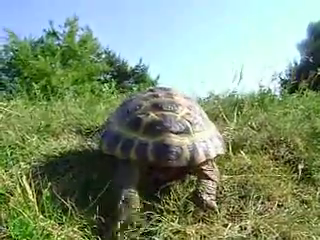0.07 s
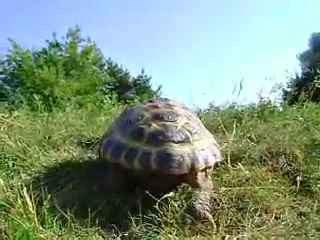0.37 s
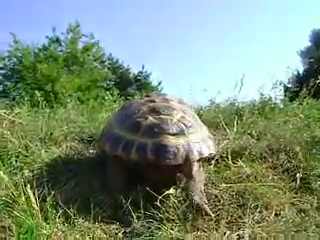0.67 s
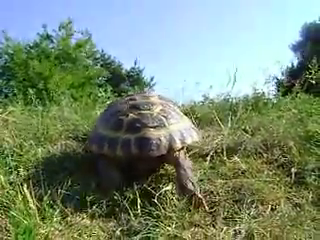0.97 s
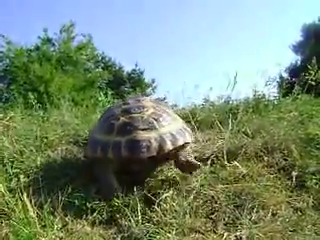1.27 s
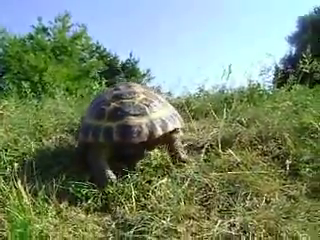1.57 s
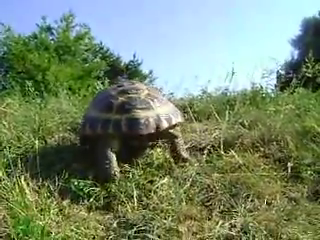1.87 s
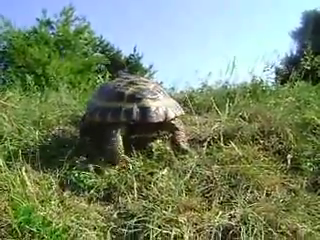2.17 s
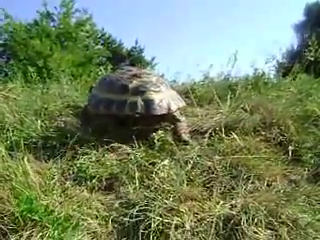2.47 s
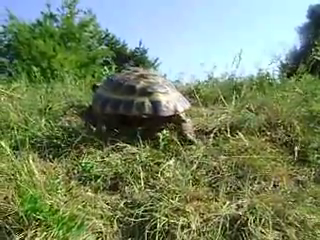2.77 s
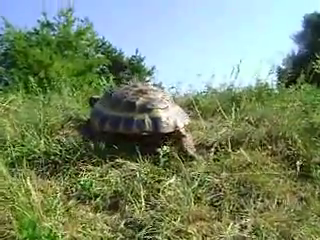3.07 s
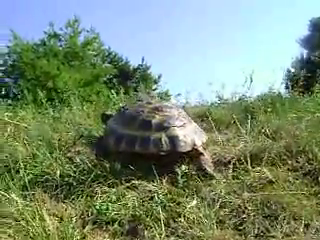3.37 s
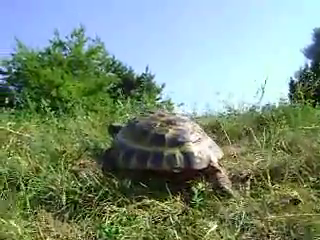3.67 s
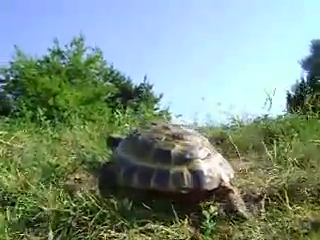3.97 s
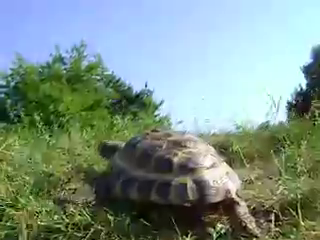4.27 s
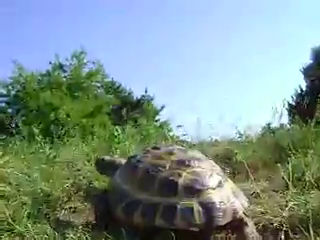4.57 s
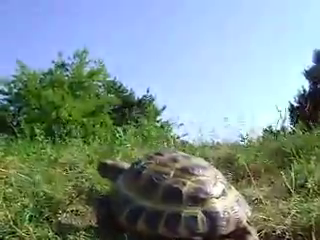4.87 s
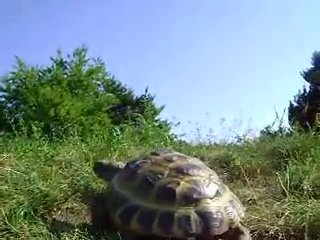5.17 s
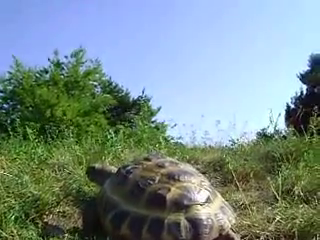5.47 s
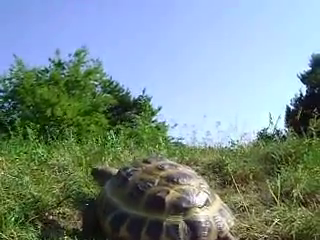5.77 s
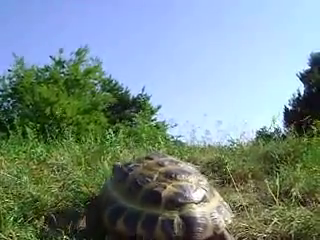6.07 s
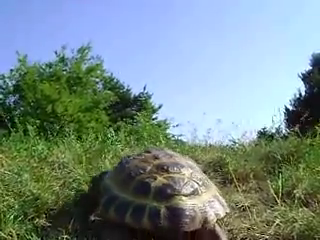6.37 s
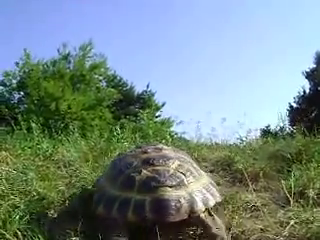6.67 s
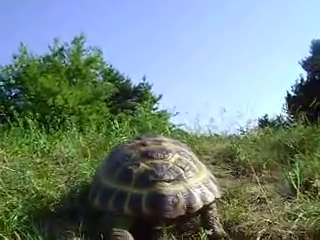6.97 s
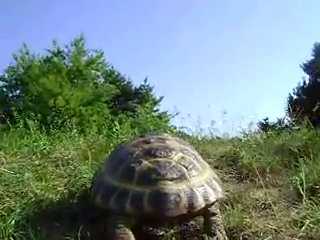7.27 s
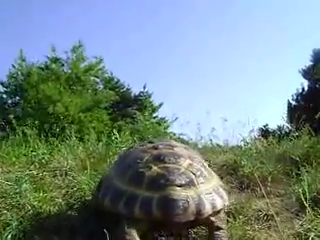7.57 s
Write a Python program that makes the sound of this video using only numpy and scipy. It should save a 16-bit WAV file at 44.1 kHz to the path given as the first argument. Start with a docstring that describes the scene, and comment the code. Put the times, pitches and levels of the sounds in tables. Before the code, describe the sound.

A tortoise walks through dry grass on an open hillside, the stalks rustling and snapping close to the microphone. Hollow clicks from a hand-held camera's case come in irregular clusters, loudest in the first three seconds. Later a songbird sings one phrase: a whistle, four warbles and a few falling chirps. Low puffs of wind bump the microphone at the start and in the second half, over a soft rush of open air.

```python
"""Tortoise in dry grass

A tortoise walks through dry grass on an open hillside, a small hand-held camera close behind it.
Stalks rustle and snap up close, and the camera's hollow case clicks in the hand.
A songbird sings one phrase, a pure gliding tone. Puffs of wind bump the microphone,
and behind it all lie the soft rush of the open air and a few faint, far-off tones."""
import sys
import numpy as np
from scipy import signal
from scipy.fft import rfft, irfft, next_fast_len
from scipy.io import wavfile
from scipy.ndimage import uniform_filter1d, map_coordinates

SR = 44100
rng = np.random.default_rng(int(sys.argv[2]) if len(sys.argv) > 2 else 0)


def to_wav(sig):
    """Store sig (one row per channel, or 1-D mono) as 16-bit WAV at the path in sys.argv[1].

    Samples outside -1..1 are clipped; the rate is SR.
    """
    pcm = np.clip(np.atleast_2d(sig), -1, 1) * 32767
    pcm = np.round(pcm).astype(np.int16)
    wavfile.write(sys.argv[1], SR, pcm.T)  # frames by channels


N = 345303

# spectrum of dry grass blades, close up: f/Hz, level/dB
BLADES = [(200, -13), (600, -1), (1000, -3.5), (1600, -4), (2500, -2), (4000, -1.5), (4600, -4), (5150, -2),
          (7000, -7.5)]


def clicks(grit_db=-12, grit_t60=.01, thud_db=-24, thud_hz=330, thud_t60=.025):
    """Close clicks: a bright, damped snap with a little grit, over the case's ring and dull thud."""
    # t/s, knock level/dB, knock f/Hz, snap level/dB, snap f/Hz
    contacts = [(.0408, -8.5, 940, -19.5, 2750), (.1212, -10.5, 950, -20.5, 2750),
                (.259, -9.5, 946, -19, 2820), (.4027, -9, 990, -19, 2750), (.569, -14.5, 825, -9, 3900),
                (.648, -19, 790, -19, 3154), (.666, -38, 900, -24, 3900), (.763, -32, 1020, -22.5, 4000),
                (1.01, -16.5, 950, -9, 3790), (1.0514, -15, 870, -8.5, 2520), (1.0572, -9, 810, -2.5, 2400),
                (1.0588, -10.5, 1030, -1.5, 4320), (1.1296, -5, 770, -1, 3800),
                (1.1312, -11, 2000, -9, 2350), (1.788, -24, 1043, -32.5, 3580),
                (1.885, -29, 960, -39, 2860), (2.299, -20, 990, -33, 2560), (2.585, -26, 851, -42, 3100),
                (2.8253, -17, 790, -7.5, 3100), (2.8733, -4.5, 720, -7.5, 4400),
                (2.8744, -19, 1550, -10, 2350), (3.0781, -25, 800, -4.5, 3920),
                (3.124, -20.5, 690, -20, 4050), (5.615, -48, 1032, -20, 5160),
                (6.044, -33.5, 1700, -30, 2800), (6.1805, -13.5, 1130, -7.5, 3550),
                (6.574, -33, 1700, -24.5, 3080), (6.624, -30, 1000, -44, 3900),
                (6.879, -21, 1000, -49.5, 3200), (7.416, -20.5, 960, -50, 3600),
                (7.565, -22, 1023, -50, 2870)]
    # modes of the case's hollow body: f/Hz, relative level/dB, t60/s
    case_modes = [(520.3, -10, .06), (700, -9, 0.054), (800, -10, 0.054), (939, 2, 0.019),
                  (1130, -3.5, 0.023), (1307, -7, 0.015), (1657, -1, 0.018), (2103, -5.5, 0.012)]
    # modes of its stiff edges: f/Hz, relative level/dB, t60/s
    edge_modes = [(2475, -2, 0.0081), (2743, -1.5, 0.0087), (3313, -1.5, .007), (3820, 0, .008),
                  (4100, -2, .008), (4920, -1.5, .009)]
    out, t = np.zeros(N), np.arange(SR // 10) / SR
    low_cut = signal.butter(2, 520, "highpass", fs=SR, output="sos")
    thud = amp(thud_db - 60 * t / thud_t60) * np.sin(2 * np.pi * thud_hz * t)
    for s, knock_db, knock_hz, snap_db, snap_hz in contacts:
        ring = struck(case_modes, knock_hz, favour_db=6.5, spread=.18, rise_s=.00044)
        knock = signal.sosfilt(low_cut, ring) + thud
        edge = struck(edge_modes, snap_hz, favour_db=10, spread=.17, rise_s=.00026)
        force = amp(snap_db)  # a harder contact is grittier and reaches higher
        grit = coloured(rng.standard_normal(len(t)), BLADES)
        grit *= amp(grit_db + 5 * force - 60 * t / grit_t60)
        cutoff_hz = snap_hz + 650 + 2300 * force
        snap = filtered(edge + grit, lambda hz: 1 / np.sqrt(1 + (hz / cutoff_hz) ** 8))
        add(out, s, amp(knock_db) * knock + force * snap)
    return out


def struck(modes, pitch_hz, favour_db, spread, rise_s):
    """One blow, peak 1: the point of contact favours the modes near its pitch."""
    t = np.arange(SR // 10) / SR
    ring = np.zeros(len(t))
    for hz, db, t60 in modes:
        favour = favour_db * np.exp(-(np.log(hz / pitch_hz) / spread) ** 2)
        turns = hz * rng.normal(1, .012) * t + rng.normal(0, .17)
        ring += amp(db + favour + rng.normal(0, 1) - 60 * t / t60) * np.sin(2 * np.pi * turns)
    ring *= 1 - np.exp(-(t / rise_s) ** 2)
    return ring / abs(ring).max()


def rustles(ticks_per_s=2500, width_hz=600, focus_db=9, rub=.22):
    """Dry blades slip past the tortoise in many tiny ticks; each tuft favours a pitch of its own."""
    # brushes and soft scuffs: t/s, length/s, level/dB, f/Hz, place of the peak/0-1
    strokes = [(.644, .034, -35.5, 3560, 0), (.674, .13, -49, 2800, .33), (.852, .048, -32.5, 3100, .06),
               (.907, .28, -42.5, 3670, .04), (1.585, .04, -35.5, 3300, .2), (1.661, .077, -43, 3100, .6),
               (1.754, .08, -39, 3300, .3), (2.798, .028, -31, 3390, .9), (2.858, .02, -34, 4300, .9),
               (3.077, .025, -24.5, 4200, .1), (3.097, .036, -24.5, 3840, .53), (3.513, .09, -42, 4000, .4),
               (5.12, .1, -45, 600, .45), (5.295, .09, -45, 700, .4), (6.162, .02, -28.5, 3300, .7),
               (6.394, .13, -47, 1800, .2)]
    out = np.zeros(N)
    for s, length, db, pitch_hz, peak in strokes:
        u = np.linspace(0, 1, int(length * SR))
        slips = rng.standard_normal(len(u)) * (rub + (rng.random(len(u)) < ticks_per_s / SR))
        tuft = filtered(slips, lambda hz: amp(focus_db * np.exp(-((hz - pitch_hz) / width_hz) ** 2)))
        swell = np.sqrt(np.interp(u, [0, np.clip(peak, .02, .98), 1], [0, 1, 0]))
        add(out, s, amp(db) * swell * coloured(tuft, BLADES))
    return out


def bird(flutter_db=.7, ground_db=-12, ground_t60=.09, bushes_db=-18, bushes_t60=.6):
    """A whistle, four warbles and a falling flourish, scattered by ground and bushes."""
    # course of the opening whistle: t/s, f/Hz, level/dB
    opening = [(4.81, 4044, -54), (4.824, 4009, -48), (4.866, 4089, -37), (4.942, 4014, -28),
               (4.98, 4035, -26), (4.99, 4032, -35)]
    # t/s, crest length/s, crest f/Hz, crest level/dB, curl level/dB
    warbles = [(5.054, .031, 4270, -24.5, -30), (5.194, .035, 4370, -26.5, -28.5),
               (5.342, .029, 4290, -22, -30.5), (5.479, .034, 4250, -19, -34)]
    # closing chirps: t/s, length/s, relative level/dB, first f/Hz, middle f/Hz, last f/Hz
    flourish = [(5.993, .019, -32, 3100, 3900, 3950), (6.013, .016, -31.5, 4200, 3850, 3100),
                (6.054, .012, -33, 5900, 5300, 5900), (6.069, .014, -30, 5900, 4950, 5900),
                (6.085, .016, -27, 5800, 4820, 5700), (6.099, .018, -27, 5800, 4500, 3850),
                (6.113, .018, -28, 4000, 3750, 3150), (6.233, .012, -33, 5900, 4900, 5800),
                (6.246, .013, -30, 5600, 4600, 4200), (6.26, .018, -27.5, 5500, 4000, 3400),
                (6.275, .016, -38, 3400, 3300, 2950), (6.302, .016, -47, 2850, 3020, 3050)]
    song = np.zeros(N)
    add(song, opening[0][0], whistle(opening))
    for s, *note in warbles:
        add(song, s, warble(*note))
    for s, *note in flourish:
        add(song, s, chirp(*note))
    song *= amp(flutter_db * wobble(150))
    return song + amp(ground_db) * echo(song, ground_t60) + amp(bushes_db) * echo(song, bushes_t60)


def whistle(course):
    """One note of nearly even pitch that swells and stops short."""
    s, hz, db = np.transpose(course)
    t = np.arange(s[0], s[-1], 1 / SR)
    return tone(np.interp(t, s, hz), np.interp(t, s, db)) * signal.windows.tukey(len(t), .05)


def warble(hold_s, crest_hz, crest_db, curl_db, flick_db=-30, waver_hz=30, sag_db=6.5):
    """Three joined parts that each swell and sag: a flick up, an arch with a rising crest, a low curl."""
    flick_s, dip_s, climb_s, curl_s = .013, .005, .017, .009
    low_hz, flick_hz, dip_hz, curl_hz = 3280, 4150, 2950, 3680  # turning points
    crest_hz_per_s, fade_db_per_hz = 6000, .0095
    drift_hz = crest_hz_per_s * hold_s / 2
    # glide lengths/s, turning points f/Hz, f/Hz below which the voice fades, level/dB
    flick = ([flick_s * 2 / 3, flick_s / 3, dip_s],
             [low_hz, curl_hz, flick_hz, dip_hz], curl_hz, flick_db)
    arch = ([climb_s, hold_s, dip_s],
            [dip_hz, crest_hz - drift_hz, crest_hz + drift_hz, dip_hz], crest_hz - drift_hz, crest_db)
    curl = ([curl_s, curl_s, curl_s / 2],
            [dip_hz, curl_hz, (dip_hz + low_hz) / 2, low_hz], (low_hz + curl_hz) / 2, curl_db)
    pitch, level = [], []
    for spans, turns_hz, full_hz, db in (flick, arch, curl):
        t = np.arange(0, sum(spans), 1 / SR)
        hz = np.interp(t, np.cumsum([0] + spans), turns_hz)
        sag = sag_db * np.linspace(-1, 1, len(t)) ** 2
        fade = fade_db_per_hz * np.maximum(full_hz - hz, 0)
        pitch.append(hz)
        level.append(db - sag - fade)
    hz = np.concatenate(pitch)
    db = uniform_filter1d(np.concatenate(level), size=60)  # smooth the joins
    return tone(hz + waver_hz * wobble(130)[:len(hz)], db) * signal.windows.tukey(len(hz), .1)


def chirp(length, db, first_hz, middle_hz, last_hz, rasp_hz=120, trim_db=-2):
    """One short, slightly raspy swoop that swells and fades."""
    u = np.linspace(0, 1, int(length * SR))
    hz = np.polyval(np.polyfit([0, .5, 1], [first_hz, middle_hz, last_hz], 2), u)
    swell = np.sqrt(np.abs(np.sin(np.pi * u)))
    return swell * tone(hz + rasp_hz * wobble(900)[:len(u)], db + trim_db)


def wind(buffet_db=-2, lumps_db=2.5, churn_db=-14):
    """Wind on the microphone: lumpy rumble, and strong eddies that push, pull and break into churn."""
    # spectrum of the low turbulence: f/Hz, level/dB
    buffet_spectrum = [(12, -38.5), (20, 0), (97, -1.5), (225, -6.5), (305, -11.5), (341, -12.5),
                       (709, -26.5), (767, -28), (900, -25.5), (1170, -50), (1980, -120)]
    # spectrum of the fine turbulence: f/Hz, level/dB
    churn_spectrum = [(150, 2), (400, 4.5), (600, -7.5), (1000, -16), (2000, -47), (4000, -78.5)]
    # single eddies hitting the microphone: t/s, level/dB, f/Hz
    eddies = [(.072, -20, 60), (.182, -18, 130), (.237, -17, 110), (.268, -19.5, 50), (.427, -20, 80),
              (.527, -10, 161), (.538, -18.5, 210), (.655, -20, 76), (3.222, -28, 112), (3.903, -28.5, 70),
              (4.837, -20, 270), (4.846, -6.5, 135), (4.859, -17, 190), (4.884, -16.5, 100),
              (5.091, -22, 131), (6.66, -16, 130), (6.725, -17, 170), (6.834, -16.5, 250),
              (6.884, -16, 200), (6.944, -14, 210), (7.057, -14, 130), (7.271, -13.5, 71), (7.579, -9, 145)]
    rumble = coloured(rng.standard_normal(N), buffet_spectrum) * amp(lumps_db * wobble(45))
    out = amp(buffet_db) * gusts() * unit(rumble)
    t = np.arange(-SR // 40, SR // 40) / SR
    for s, db, hz in eddies:
        phase = 2 * np.pi * hz * t
        push = -np.sin(phase) / np.cosh(phase / 2.24)
        churn = coloured(rng.standard_normal(len(t)), churn_spectrum) / np.cosh(phase / 5)
        add(out, s + t[0], amp(db) * (push + amp(churn_db) * churn) * np.hanning(len(t)))
    return out


def gusts(rise_s=.05, fall_s=.13, breeze_db=-44):
    """Wind strength: puffs over a light breeze swell 20 dB in rise_s, hold, and fade 20 dB in fall_s."""
    # t/s, time held/s, relative level/dB
    puffs = [(0, .29, -28), (.39, .03, -34), (.525, .02, -20), (.63, .04, -31), (.75, .17, -38),
             (1.88, .17, -42), (3.21, .04, -34), (4.81, .085, -26), (5.07, .3, -36.5), (5.88, .22, -34.5),
             (6.34, .05, -36), (6.66, .38, -29), (7.21, .15, -32), (7.49, .34, -28.5)]
    t = np.arange(N) / SR
    power = np.full(N, amp(breeze_db) ** 2)
    for s, held, db in puffs:
        drop_db = 20 * np.maximum((s - t) / rise_s, (t - s - held) / fall_s).clip(0)
        power += amp(db - drop_db) ** 2
    return np.sqrt(power)


def air(rush_db=-41, patchy_db=.5, tone_trim_db=-1, unsteady_hz=5):
    """The steady rush of the open hillside, with faint gliding tones far away."""
    # spectrum of the rush: f/Hz, level/dB
    rush_spectrum = [(15, -37.5), (25, -8.5), (70, -8), (115, -14.5), (150, -6), (210, -7.5), (270, -12.5),
                     (500, -10), (1000, -15.5), (2400, -25), (4050, -23), (5200, -27), (7000, -31)]
    # t/s, length/s, relative level/dB, first f/Hz, last f/Hz
    far_tones = [(.25, 0.72, -44, 442, 440), (5.12, .11, -40, 513, 500), (5.45, 0.29, -41, 492, 457.7),
                 (5.58, .35, -47.5, 466, 455), (6.38, .035, -48, 2540, 2080),
                 (6.415, .045, -50, 2500, 2060)]
    out = amp(rush_db + patchy_db * wobble(7)) * coloured(rng.standard_normal(N), rush_spectrum)
    for s, length, db, first_hz, last_hz in far_tones:
        u = np.linspace(0, 1, int(length * SR))
        hz = first_hz + (last_hz - first_hz) * u + unsteady_hz * wobble(40)[:len(u)]
        swell = amp(db + tone_trim_db) * np.sin(np.pi * u)
        add(out, s, swell * np.sin(2 * np.pi * np.cumsum(hz) / SR))
    return out


def echo(x, t60):
    """Many small reflections dying away."""
    t = np.arange(SR // 2) / SR
    tail = rng.standard_normal(len(t)) * amp(-60 * t / t60)
    return signal.fftconvolve(x, tail / np.linalg.norm(tail))[:N]


def tone(hz, db):
    """A sine that follows a pitch, at an rms level."""
    return amp(db) * np.sqrt(2) * np.sin(2 * np.pi * np.cumsum(hz) / SR)


def amp(db):
    """Decibels to gain."""
    return 10 ** (np.asarray(db) / 20)


def unit(x):
    """Scaled to rms 1."""
    return x / np.sqrt(np.mean(x ** 2) + 1e-20)


def wobble(rate):
    """A smooth random curve, rate knots a second."""
    knots = rng.standard_normal(int(N * rate / SR) + 4)
    return map_coordinates(knots, [np.arange(N) * rate / SR])


def filtered(x, response):
    """x through a gain that depends on frequency."""
    size = next_fast_len(len(x) + 8192)
    return irfft(rfft(x, size) * response(np.fft.rfftfreq(size, 1 / SR)), size)[:len(x)]


def coloured(x, points):
    """x through a spectrum of (f/Hz, level/dB) points, at rms 1."""
    f, db = np.transpose(points)
    return unit(filtered(x, lambda hz: amp(np.interp(np.log(hz + 1), np.log(f), db))))


def add(track, s, sound):
    """Mix a sound into the track at time s."""
    span = track[max(round(s * SR), 0):][:len(sound)]
    span += sound[:len(span)]


def scene():
    """Everything reaches one small microphone, close behind the tortoise."""
    return (clicks() + rustles() + bird() + wind() + air())[None]


def record(dry, ceiling=.79, top_hz=16700):
    """The camera's microphone has a narrow band, and the loudest clicks clip."""
    # microphone response: f/Hz, level/dB
    response = [(4000, 0), (5050, -0.5), (5450, -7), (5950, -17), (6300, -35.5), (6900, -75), (8000, -120)]
    narrow = filtered(dry[0], lambda hz: amp(np.interp(hz, *np.transpose(response))))
    clipped = np.clip(narrow, -ceiling, ceiling)
    return filtered(clipped, lambda hz: hz < top_hz)[None]


dry = scene()
out = record(dry)
to_wav(out)
```